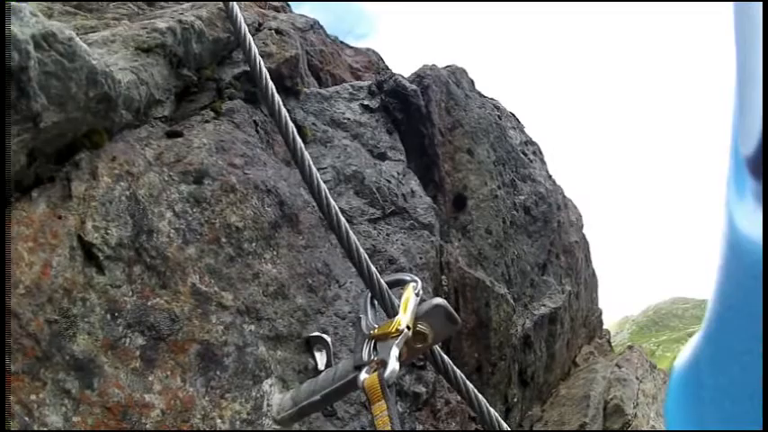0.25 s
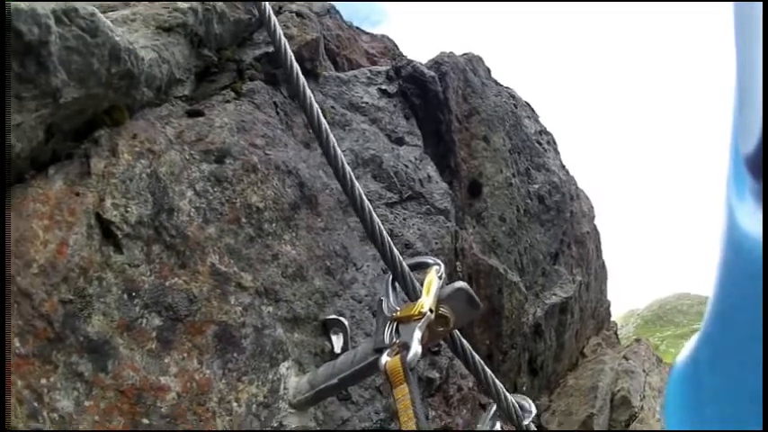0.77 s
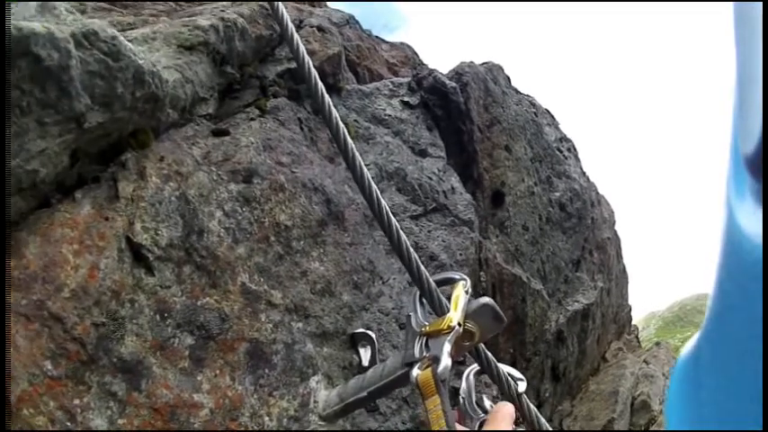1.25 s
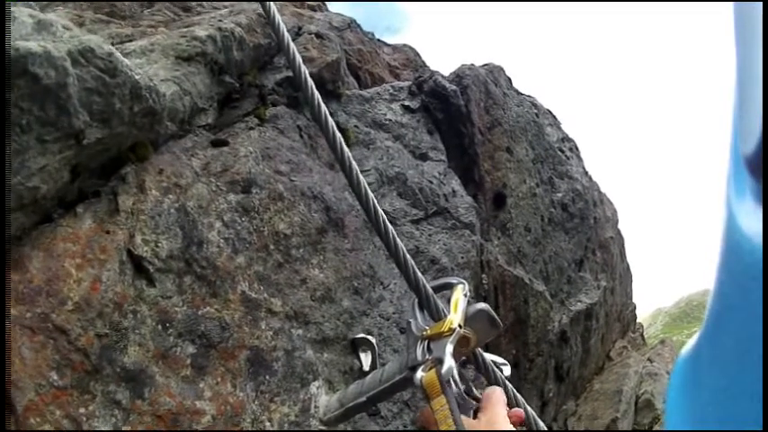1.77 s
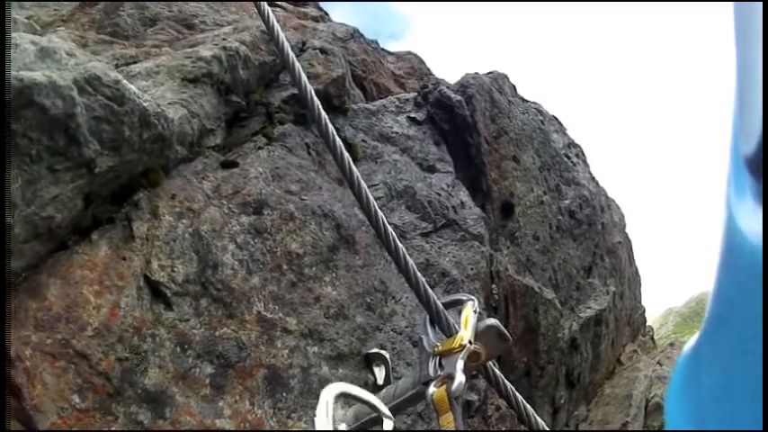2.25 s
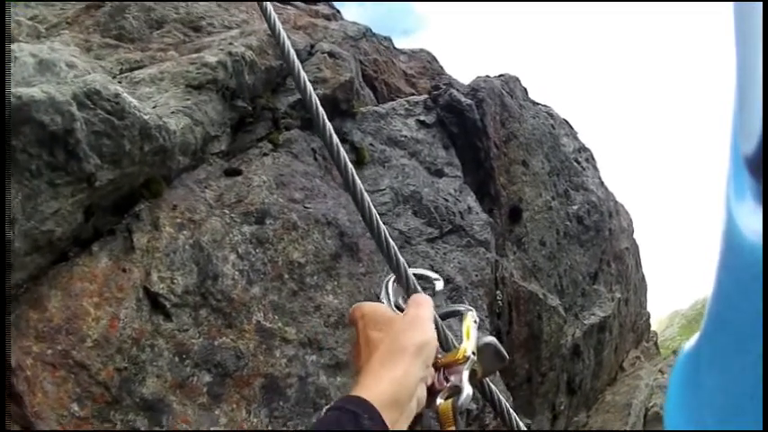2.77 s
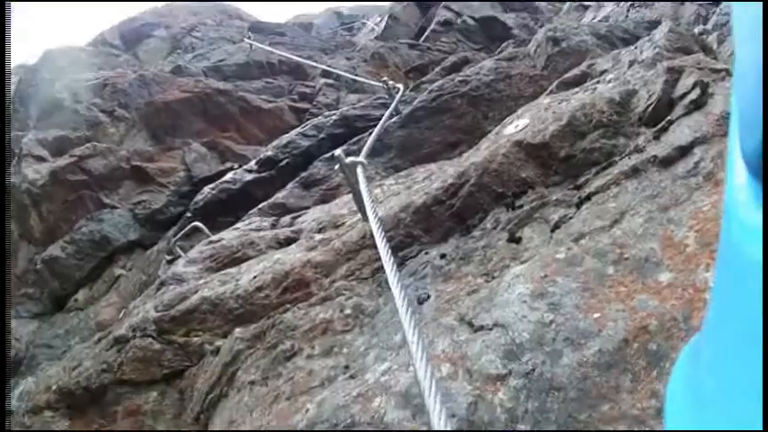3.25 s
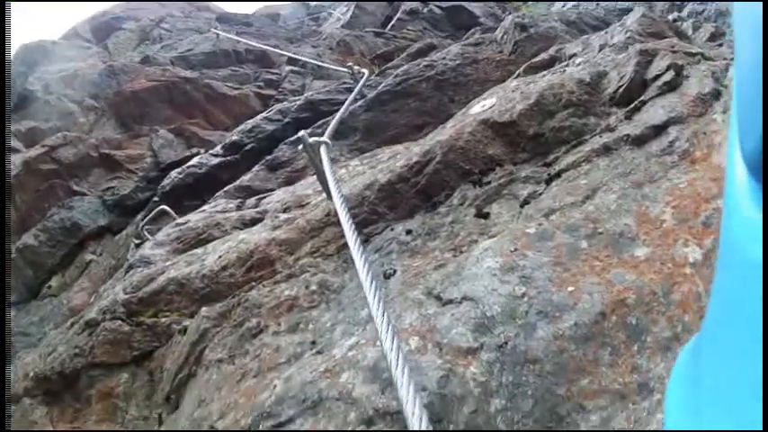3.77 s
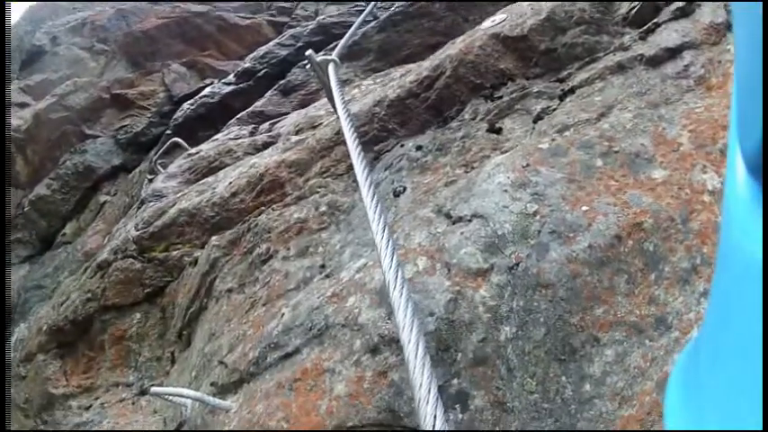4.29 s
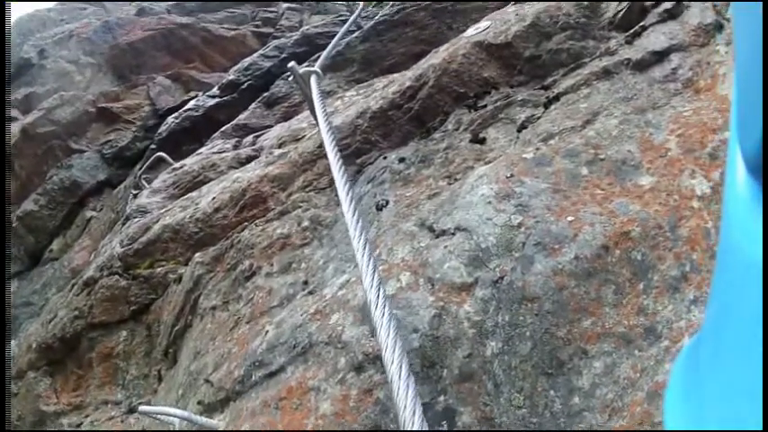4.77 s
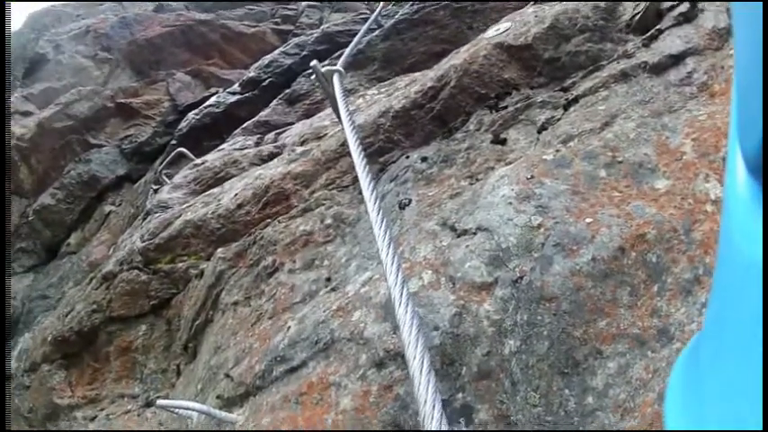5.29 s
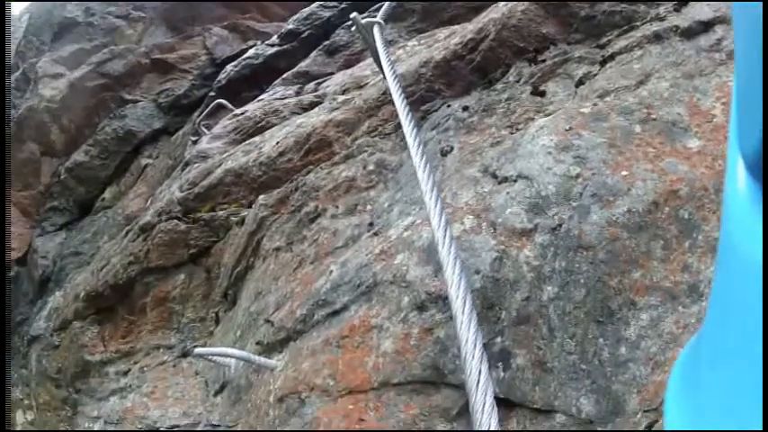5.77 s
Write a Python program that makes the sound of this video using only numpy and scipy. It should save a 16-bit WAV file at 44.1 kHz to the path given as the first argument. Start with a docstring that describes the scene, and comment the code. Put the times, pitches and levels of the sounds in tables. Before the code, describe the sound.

Two metal carabiners are worked along a steel safety cable on an open mountainside, close to a helmet microphone and straight ahead. From 0.3 to 2 seconds come light, dry, irregular clicks and short rattles over the cable's strands. A sharp clink lands at about 2.1 seconds. From 2.5 seconds the clips scrape, rattle and knock busily, peaking in the loudest clacks at about 3.1 to 3.2 seconds. Scattered lighter knocks follow, with a sharp one near 3.9 seconds, and a short lull after 4.5. Between 5.1 and 5.7 seconds comes a second quick cluster of bright clinks, tiny squeaks and a short scrape, ending in a hard clink that rings briefly. A faint steady hiss of air runs throughout, with a barely audible thin electronic whine. One very soft, low, distant rush of air swells and fades around 4.4 seconds.

```python
"""On an open mountainside, a climber slides two carabiners (metal clips) up a steel safety cable
and clips them past an anchor, close to a helmet camera. Held in the hand, they clack drily, squeak,
and scrape and rattle over the cable's strands. Hanging free, they knock together and ring until
the next touch stops them. Under it lie a faint steady hiss, one distant rush of air
and the thin whine of the camera's electronics."""
import sys
import numpy as np
from scipy import signal
from scipy.fft import rfft, irfft, next_fast_len
from scipy.io import wavfile
from scipy.ndimage import uniform_filter1d

SR = 44100
rng = np.random.default_rng(int(sys.argv[2]) if len(sys.argv) > 2 else 0)


def int16_out(signal):
    """Quantize to a 16-bit WAV file."""
    q = np.round(np.clip(np.atleast_2d(signal).T, -1, 1) * 32767)
    wavfile.write(sys.argv[1], SR, q.astype(np.int16))


N = 266364

# tone colour of metal held in the hand: pitch_hz, level_db
HELD_METAL_COLOUR = [(500, -64), (1200, -19), (1900, -13), (2550, -7), (3050, -6.5), (3850, 2.5),
                     (4700, -1.5), (5400, -4), (6300, -5), (7000, -9.5), (8000, -21), (10000, -34),
                     (12400, -44.5)]


def amp(db):
    """Turn decibels into a gain. Every fade_s below is the time to fade by 60 dB."""
    return 10 ** (np.asarray(db) / 20)


def unit(x):
    """Scale a signal so that its average (rms) level is 1."""
    return x / np.sqrt(np.mean(x ** 2) + 1e-20)


def along(points, hz):
    """Read a curve of (pitch_hz, level_db) points at hz, with octaves evenly spaced."""
    pitches, levels = np.transpose(points)
    return np.interp(np.log(hz + 1), np.log(pitches), levels)


def seconds(length_s):
    """The time of each sample in a stretch of sound."""
    return np.arange(int(length_s * SR)) / SR


def add(track, start_s, sound):
    """Mix a sound into the track at start_s."""
    part = track[int(start_s * SR):][:len(sound)]
    part += sound[:len(part)]


def coloured(x, *curves):
    """Filter x by the sum of some (pitch_hz, level_db) curves."""
    size = 2 * next_fast_len(len(x) // 2 + 512)
    hz = np.fft.rfftfreq(size, 1 / SR)
    gain_db = sum(along(curve, hz) for curve in curves)
    # folding the cepstrum makes the filter ring only after a hit, never before it
    cepstrum = irfft(np.log(amp(gain_db)))
    cepstrum[1:size // 2] *= 2
    cepstrum[size // 2 + 1:] = 0
    return irfft(rfft(x, size) * np.exp(rfft(cepstrum)))[:len(x)]


def wobble(count, smooth_samples):
    """A random wavering: smoothed noise at level 1."""
    return unit(uniform_filter1d(rng.standard_normal(count), size=smooth_samples))


def mountain_hiss(below_db=-58.3, above_db=-58, move_s=2.98, blend_s=0.44):
    """The mountainside hisses steadily; its colour shifts as the head moves along the rock."""
    # the hiss below the anchor: pitch_hz, level_db
    below_colour = [(22, -9.5), (50, -3), (130, -1), (300, -4.5), (580, 0), (900, -5), (1600, -8.5),
                    (2350, -7.5), (3000, -15), (3800, -7.5), (5100, -22), (6250, -25.5), (7600, -38),
                    (12400, -40)]
    # the hiss above the anchor: pitch_hz, level_db
    above_colour = [(22, -14.5), (50, -2.5), (200, -3.5), (350, 0), (560, -1.5), (1000, -5), (1800, -8),
                    (2600, -7), (3050, -15.5), (3850, -8), (5100, -22.5), (6250, -24.5), (7600, -39.5),
                    (12400, -39.5)]
    below = amp(below_db) * unit(coloured(rng.standard_normal(N), below_colour))
    above = amp(above_db) * unit(coloured(rng.standard_normal(N), above_colour))
    above_share = (1 + np.tanh((np.arange(N) / SR - move_s) / blend_s)) / 2
    return np.sqrt(1 - above_share) * below + np.sqrt(above_share) * above


def distant_rush(peak_s=4.42, width_s=0.45, peak_db=-67):
    """A soft, low rush of air rises once and falls away."""
    # tone colour of the rushing air: pitch_hz, level_db
    rush_colour = [(150, -29), (320, -3.5), (460, -3), (650, -2), (1500, -43.5)]
    swell = np.exp(-((np.arange(N) / SR - peak_s) / width_s) ** 2 / 2)
    return amp(peak_db) * swell * unit(coloured(rng.standard_normal(N), rush_colour))


def cable_scrapes(ticks_per_s=700, fade_s=0.027):
    """Sliding over the twisted wires makes a dense run of tiny ticks."""
    # slides along the cable: start_s, length_s, level_db
    slides = [(0.915, 0.047, -63.5), (1.158, .11, -74), (2.576, 0.054, -55), (2.641, 0.085, -53),
              (2.845, 0.031, -54), (2.919, 0.037, -50), (3.014, 0.13, -52), (3.384, 0.11, -63.5),
              (5.621, 0.12, -50.5)]
    out = np.zeros(N)
    for start_s, length_s, level_db in slides:
        progress = seconds(length_s) / length_s
        count = len(progress)
        ticks = (rng.random(count) < ticks_per_s / SR) * rng.exponential(size=count)
        fading_ticks = signal.lfilter([1], [1, -amp(-60 / (fade_s * SR))], ticks)
        scrape = coloured((fading_ticks + 0.1) * rng.standard_normal(count), HELD_METAL_COLOUR)
        swell = np.sqrt(np.abs(np.sin(np.pi * progress)))
        add(out, start_s, amp(level_db) * unit(scrape) * swell)
    return out


def squeaks(sag=0.0194, roughness=0.032):
    """Metal sticks and slips on metal in tiny chirps whose pitch sags as the slip slows."""
    # squeaky slips: start_s, length_s, pitch_hz, level_db
    slips = [(0.338, 0.016, 8210, -50), (5.444, 0.033, 2950, -45), (5.493, 0.014, 2904, -33),
             (5.495, 0.03, 8300, -48.5), (5.499, 0.014, 7320, -30), (5.689, 0.0083, 7620, -26)]
    out = np.zeros(N)
    for start_s, length_s, pitch_hz, level_db in slips:
        progress = seconds(length_s) / length_s
        bend = 1 + sag * (0.5 - progress) + roughness * wobble(len(progress), 30)
        chirp = np.sin(2 * np.pi * np.cumsum(pitch_hz * bend) / SR)
        add(out, start_s, amp(level_db) * np.sin(np.pi * progress) * chirp)
    return out


def ringing_parts(attack_s=0.00022, stop_fade_s=0.0218, tilt_centre_hz=4850):
    """A struck part rings with its own set of tones until the next touch chokes it."""
    # by its neighbour, the hand or the cable; for each part: pitch_hz, level_db, fade_s
    part_tones = { "first": [(2729, -17, .33), (3940, -25, .07), (4850, 0, .16), (6460, -3, .125),
                  (9555, -35, .088), (10410, -41, .09)], "wedged": [(3940, -0.5, 0.025), (4860, 1, 0.04),
                  (9980, -26, .025)], "second": [(4766, -5, 0.45), (6250, -15, .25), (7400, -4.5, 0.11),
                  (9900, -31.5, .1)], "gate": [(5390, 1.5, 0.18), (7400, -24, 0.22)],
                  "gripped": [(2560, -14, 0.022), (4380, -3.5, 0.024), (4550, -0.5, 0.016),
                  (6450, -7, 0.017)], "on cable": [(3525, 8.5, 0.019), (4050, -23, 0.042),
                  (5050, 2.5, 0.02), (5980, -7.5, 0.02), (6550, -4, 0.024)], }
    # blows that leave a part ringing: start_s, part, level_db, tilt_db_per_octave, free_s
    blows = [(0.4215, "on cable", -31.5, 13.5, .03), (1.715, "second", -69, 15.5, .1),
             (2.149, "gripped", -15, -3.5, 0.054), (3.336, "on cable", -54.5, -30.5, 0.033),
             (3.853, "on cable", -25, 7.5, .03), (3.51, "gate", -64, -2, .06), (3.571, "gate", -67, 12, .1),
             (3.9045, "gate", -48, -16, .09), (4.032, "second", -69, -5, .09),
             (4.122, "gate", -68, 24, 0.068), (4.376, "first", -54, -9, 0.069),
             (4.443, "first", -50.5, -1, .09), (5.077, "first", -30, 1, 0.076),
             (5.279, "first", -36, -13, 0.0033), (5.2975, "first", -29.5, 2.5, 0.015),
             (5.391, "first", -27.5, -2, 0.015), (5.4445, "first", -36, -13, 0.022),
             (5.504, "first", -46, 21, 0.037), (5.615, "second", -53, 17, 0.06),
             (5.6915, "wedged", -14.5, -3.5, .008), (5.6915, "second", -44, 5, .4)]
    out, t = np.zeros(N), seconds(0.5)
    for start_s, part, level_db, tilt, free_s in blows:
        onset = 1 - np.exp(-t / attack_s)
        choke = amp(-60 * np.maximum(t - free_s, 0) / stop_fade_s)
        for pitch_hz, tone_db, fade_s in part_tones[part]:
            tilt_db = tilt * np.log2(pitch_hz / tilt_centre_hz)
            start_db = level_db + tone_db + tilt_db + rng.standard_normal()
            tone = np.sin(2 * np.pi * (pitch_hz * t + rng.random()))
            add(out, start_s, onset * choke * amp(start_db - 60 * t / fade_s) * tone)
    return out


def clack(level_db, body_db, bright_db, fade_s, pitch_hz):
    """One contact cracks, chatters briefly with two tones set by the grip, and leaves a shiver."""
    # tone colour of the gear's shiver after the blow: pitch_hz, level_db
    shiver_colour = [(2000, -1.5), (4000, 1.5), (6500, 1), (7500, -2), (9000, -11)]
    attack_s, crack_fade_s = 0.00062, 0.0027
    shiver_db, shiver_fade_s = -23, 0.11
    hard_blow_db = -17.5
    t = seconds(0.12)
    upper_hz = 6224 * (1 + 0.037 * rng.standard_normal())  # the grip shifts the upper tone
    main_tone = np.sin(2 * np.pi * (pitch_hz * t + rng.random()))
    upper_tone = np.sin(2 * np.pi * (upper_hz * t + rng.random()))
    tones = 0.36 * main_tone + 0.33 * upper_tone
    crack = rng.standard_normal(len(t)) * (1 + 0.54 * amp(-60 * t / crack_fade_s))
    chatter = np.exp(0.28 * wobble(len(t), 20))
    envelope = amp(-60 * t / max(fade_s, 0.004)) * (1 - np.exp(-t / attack_s))
    blow = (tones + crack) * chatter * envelope
    shiver_noise = coloured(rng.standard_normal(len(t)), shiver_colour)
    shiver = amp(shiver_db - 60 * t / shiver_fade_s) * (shiver_noise + 0.22 * tones)
    # brighter and harder blows have more of the highest treble
    edge_db = 4 + 0.6 * bright_db + 0.35 * (level_db - hard_blow_db)
    hardness = [(1200, body_db - 2.5), (2400, body_db), (4000, 0), (6300, bright_db), (8600, edge_db)]
    sound = coloured(blow + shiver, HELD_METAL_COLOUR, hardness)
    # level_db is the level the clack would have with all its energy spread over 5 ms
    return amp(level_db) * sound * np.sqrt(0.005 * SR / np.sum(sound ** 2))


def strand_rattles(fade_s=0.026, pitch_hz=3966, swell_db=4):
    """A dragged carabiner ticks from strand to strand almost evenly, with a boost at mid-stroke."""
    # drags over the strands: start_s, end_s, ticks_per_s, first_db, last_db, body_db, bright_db
    drags = [(0.679, 0.7, 55, -45, -60, 14, 12), (0.727, 0.757, 66, -45, -51, 13, 7),
             (1.161, 1.171, 90, -47.5, -48, 6, 4), (1.191, 1.238, 64, -44, -46, -5, 4),
             (1.484, 1.5536, 57, -45.5, -53, -2, -1.5), (2.176, 2.206, 66, -47.5, -50, 15.5, 6),
             (2.649, 2.683, 94, -33.5, -32.5, -7.5, 8), (2.712, 2.752, 75, -53.5, -48, 10, 5),
             (3.008, 3.017, 110, -46.5, -47, 2, 2), (3.058, 3.069, 130, -49, -42, 6, -4),
             (3.123, 3.141, 140, -50, -46.5, -5, -4), (3.414, 3.477, 32, -48.5, -48.5, 5.5, -3),
             (4.145, 4.158, 83, -45.5, -50.5, 6, 4), (4.369, 4.373, 140, -51, -51, 0, 4),
             (5.346, 5.359, 66, -49, -50.5, 5, -3), (5.638, 5.649, 100, -42, -40.5, 6, 2)]
    stray_limits = [0.001, 1.5, 0.04]  # time_s, level_db, share of the pitch
    out = np.zeros(N)
    for start_s, end_s, ticks_per_s, first_db, last_db, body_db, bright_db in drags:
        length_s = end_s - start_s
        for progress in np.linspace(0, 1, round(length_s * ticks_per_s) + 1):
            late_s, louder_db, higher = rng.uniform(-1, 1, 3) * stray_limits
            level_db = first_db + (last_db - first_db) * progress + swell_db * np.sin(np.pi * progress)
            tick = clack(level_db + louder_db, body_db, bright_db, fade_s, pitch_hz * (1 + higher))
            add(out, start_s + length_s * progress + late_s, tick)
    return out


def carabiner_knocks():
    """The carabiners knock against the cable, the anchor and each other."""
    # single knocks of metal on metal: start_s, level_db, body_db, bright_db, fade_s, pitch_hz
    knocks = [(0.3007, -48, 1, 8, .023, 3450), (0.333, -56, 0, 11, .05, 5280),
              (0.3483, -44, -9, -4, .027, 4660), (0.4201, -36, 0, 1, 0.05, 4760),
              (0.6625, -36, 7.5, 4, 0.028, 3540), (0.7824, -52, 11, -2, .029, 3690),
              (1.0533, -43.5, -21, -2, 0.024, 3900), (1.3035, -47, 3, -4, .023, 4050),
              (1.6507, -53.5, -13, -2, 0.032, 4400), (1.7144, -52.5, -2, -3, .042, 5080),
              (1.853, -53, -12, -7, 0.05, 4420), (1.9062, -49, -35, -14, 0.017, 4700),
              (2.1475, -29.5, 3, 7, 0.0076, 4260), (2.4257, -47, 8, 2.5, 0.046, 3830),
              (2.5687, -30.5, -1.5, 3, 0.044, 4860), (2.618, -49, 1, -6, .045, 4320),
              (2.7353, -35, -12, 4, 0.025, 4570), (2.824, -34, 5, 5.5, 0.041, 3610),
              (2.838, -29, 1.5, 3, .03, 3980), (2.886, -44.4, 10, 4, 0.032, 3920),
              (2.9367, -26.5, 8, 5.5, 0.016, 3890), (3.031, -39, 6, 9, 0.025, 4170),
              (3.077, -40, -1, 4, 0.028, 4240), (3.0818, -21.5, -7.5, 5.5, 0.028, 3954),
              (3.088, -37.5, -3, 11, .022, 4460), (3.102, -38, 0, 6, .025, 5040),
              (3.1474, -18.5, -5.5, 15, 0.035, 4300), (3.1546, -17, -7.5, -0.5, 0.013, 4150),
              (3.178, -27, -4.5, 9.5, 0.04, 4090), (3.2785, -54, -3, -8, .018, 3960),
              (3.3356, -51, 2, 3, 0.053, 3340), (3.499, -41.5, 10, 2, 0.035, 3900),
              (3.51, -35, 0.5, -2, 0.0044, 3400), (3.5693, -38.5, 0.5, -3, 0.013, 3480),
              (3.852, -24, -2, 1.5, 0.014, 3830), (3.9037, -41, 4, -4, 0.015, 3520),
              (4.0061, -33.5, 1, 2, 0.017, 3580), (4.032, -33, -10, 1, 0.018, 4090),
              (4.1213, -45, 6, 3, .018, 4000), (4.2585, -51.5, 15, -3, .042, 3980),
              (4.2962, -56.5, -3, -3, 0.032, 3830), (4.442, -39.5, -4, 4, .012, 3860),
              (5.0763, -29, -1.5, -9, 0.024, 5270), (5.1473, -48.5, -8, 1, .026, 4930),
              (5.2785, -30.5, 3, 4, .028, 4820), (5.2964, -24, -7, 0, 0.0115, 4760),
              (5.3901, -23, -10, -6, 0.016, 4830), (5.414, -48.5, 17, 5, .027, 4900),
              (5.4434, -27.5, 3, -1, 0.028, 4960), (5.476, -38, 11, 4, .015, 3220),
              (5.5027, -29, -1, -4, 0.026, 3880), (5.5137, -30.5, 1, -8, 0.012, 3620),
              (5.551, -41, -1, 1, 0.031, 5020), (5.614, -29, -4, -7.5, 0.014, 3760),
              (5.675, -42.5, 8, 8, 0.12, 4630), (5.6897, -23.5, -6.5, 2, 0.018, 4550)]
    out = np.zeros(N)
    for start_s, *blow in knocks:
        add(out, start_s, clack(*blow))
    return out


def scene():
    """The gear is straight ahead, so left and right are almost the same except in the treble."""
    # faint left-right treble fizz on the clacks: pitch_hz, level_db
    clack_fizz = [(1500, -47), (3000, -43.5), (4500, -43.5), (6000, -30.5), (10000, -23.5)]
    # faint left-right treble fizz on the hiss: pitch_hz, level_db
    hiss_fizz = [(600, -48), (2600, -46.5), (4200, -39.5), (5200, -19), (7600, -6.5), (12100, -1)]
    centre = carabiner_knocks() + ringing_parts() + squeaks() + cable_scrapes()
    centre += mountain_hiss() + strand_rattles() + distant_rush()
    fizz = coloured(carabiner_knocks() + strand_rattles(), clack_fizz)
    fizz += coloured(mountain_hiss(), hiss_fizz)
    return np.array([centre + fizz, centre - fizz])


def record(dry, top_hz=12650):
    """The camera adds a thin whine and keeps nothing above top_hz."""
    # steady tones of the camera's electronics: pitch_hz, level_db
    whine_tones = [(8269, -102), (11025, -88.5)]
    whine = sum(amp(db) * np.sin(2 * np.pi * hz * np.arange(N) / SR) for hz, db in whine_tones)
    size = next_fast_len(N + 8192)
    kept_band = np.fft.rfftfreq(size, 1 / SR) < top_hz
    return irfft(rfft(dry + whine, size) * kept_band, size)[:, :N]


dry = scene()
out = record(dry)
int16_out(out)
```